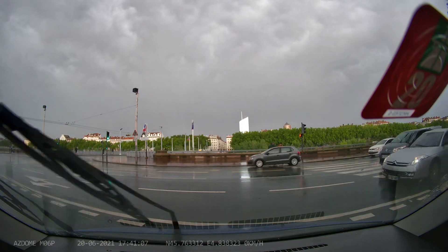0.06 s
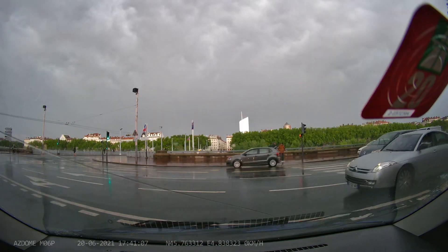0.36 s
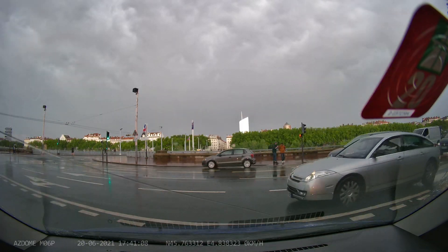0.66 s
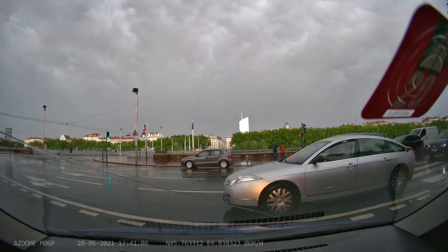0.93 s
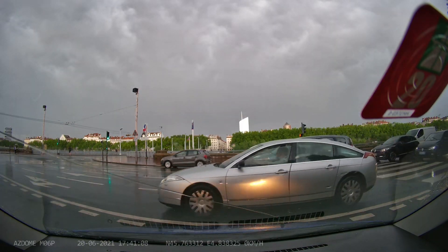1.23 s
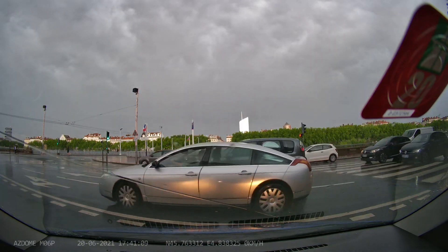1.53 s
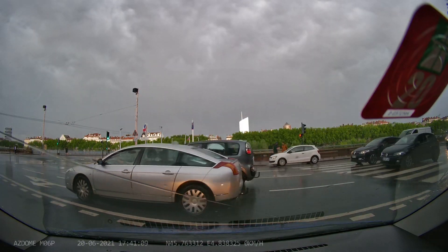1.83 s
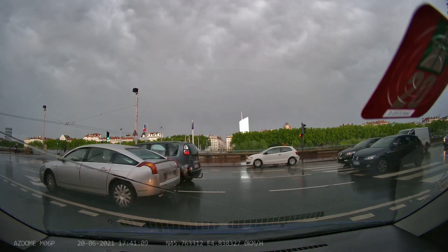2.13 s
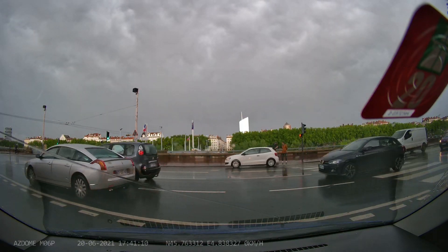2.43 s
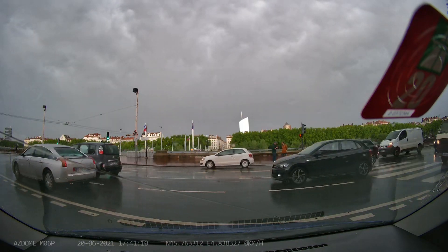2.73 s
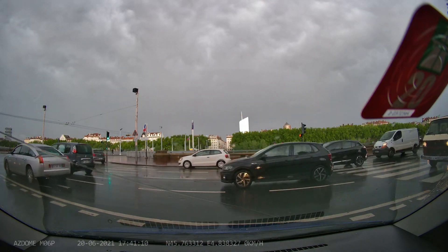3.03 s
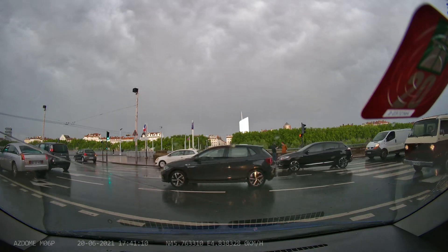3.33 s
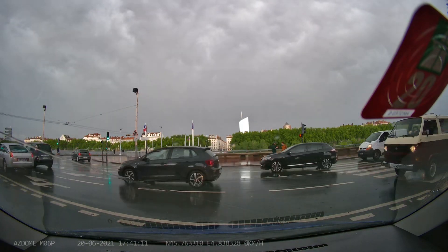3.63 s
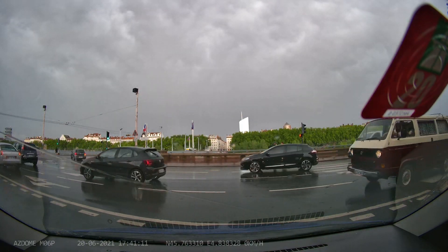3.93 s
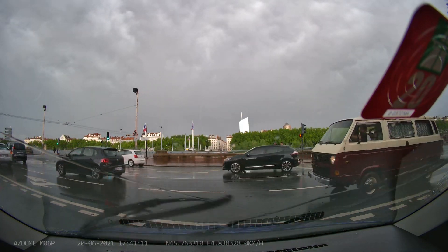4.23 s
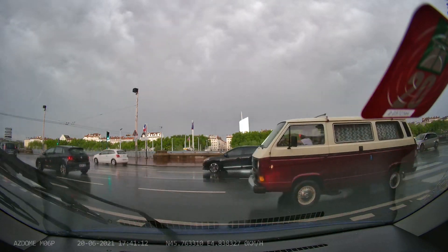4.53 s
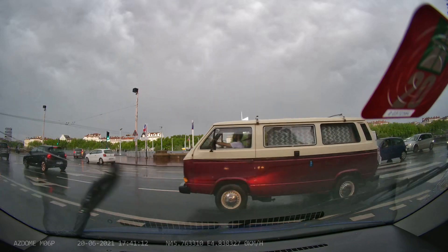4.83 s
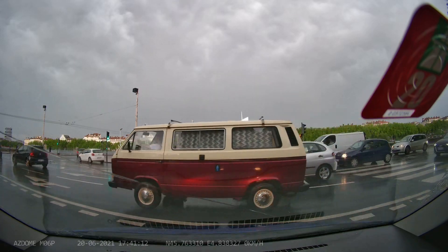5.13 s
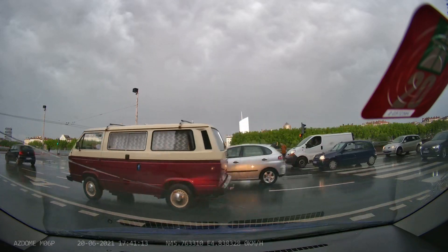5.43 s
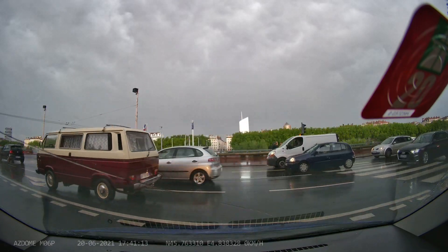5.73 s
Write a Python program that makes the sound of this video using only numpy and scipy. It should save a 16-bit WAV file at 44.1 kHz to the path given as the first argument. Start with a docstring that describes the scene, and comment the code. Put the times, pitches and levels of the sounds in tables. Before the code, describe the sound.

A wiper thrums and bumps as a car's engine settles to a low idle, heard from behind the windscreen. Something in the cabin rasps in several brief bursts, with light plastic knocks and dull thumps around them. Outside, cars and a van drone by on the wet street, dulled by the closed windows and stronger in the second half, when the wipers make another, stuttering sweep.

```python
"""Vehicles drone and swish past a wet junction, heard from inside a waiting car: gliding exhaust tones
over rumble, tyre roar and spray. Something in the cabin, perhaps a lever or a seat, rasps in short
bursts of slips that shake the trim. The wipers thrum and judder through two sweeps while the car's
own engine sinks to idle, with soft thuds, plastic ticks and faint squeaks in between."""
import sys
import numpy as np
from scipy import signal
from scipy.fft import rfft, irfft, next_fast_len
from scipy.io import wavfile
from scipy.ndimage import map_coordinates

SR = 44100
rng = np.random.default_rng(int(sys.argv[2]) if len(sys.argv) > 2 else 0)


def file_out(sig):
    """Save sig as 16-bit WAV at sys.argv[1]."""
    # one column per channel
    cols = np.atleast_2d(sig).T
    # limit, then scale
    lim = np.clip(cols, -1, 1)
    pcm = np.round(lim * 32767).astype(np.int16)
    wavfile.write(sys.argv[1], SR, pcm)


N = 263673
NOW = np.arange(N) / SR

# Colours of road rumble, tyre roar and wet spray through closed windows: f/Hz, level/dB
ROAD_RUMBLE = [(20, -17), (50, 4.5), (100, 2.5), (160, 0), (220, -8), (320, -8), (480, -22.5), (700, -43.5),
               (4000, -68)]
TYRE_ROAR = [(300, -14), (480, 3.5), (620, -2), (950, -2), (1300, -4.5), (1650, -14), (2200, -20),
             (3500, -28.5)]
WET_SPRAY = [(1400, -12), (2200, -3), (2530, 3), (2900, -5), (3400, -3.5), (4100, -14), (5500, -20),
             (9000, -32)]
# Pass-bys: nearest t/s, time for the drone to fall 12 dB/s, exhaust f/Hz, glide/(Hz/s), drone/dB,
# octave re firing tone/dB, rumble/dB, spray/dB
PASS_BYS = [(.25, 0.4, 100.7, -25, -52.5, -24, -52, -77.5), (1.831, 0.29, 91.5, 26, -46.5, -30, -63, -82),
            (3.692, 0.22, 101, -11.5, -35, -30, -56, -82), (4.02, 0.18, 103.2, 5, -34, -32, -49.5, -73.5),
            (5.15, 1.1, 66.22, 12.5, -42.5, -12.5, -48.5, -72.5), (5.9, 0.7, 73.66, 8, -50, -29, -56, -69)]
def traffic(half_power_s=0.48, far_rumble_db=-59.5, far_roar_db=-71.5, roar_over_spray_db=6):
    """Each vehicle brings its drone, rumble, tyre roar and spray over the wash of far traffic."""
    drones, rumble_power, spray_power = 0, 0, 0
    for s, fall_s, hz, glide, drone_db, octave_db, rumble_db, spray_db in PASS_BYS:
        drones += exhaust_drone(s, fall_s, hz, glide, drone_db, octave_db)
        rumble_power += amp(rumble_db) ** 2 * nearness(s, half_power_s)
        spray_power += amp(spray_db) ** 2 * nearness(s, half_power_s)
    rumble_gain = np.hypot(amp(far_rumble_db), np.sqrt(rumble_power))
    roar_gain = np.hypot(amp(far_roar_db), amp(roar_over_spray_db) * np.sqrt(spray_power))
    rumble = rumble_gain * amp(2.0 * wobble(11)) * noise(ROAD_RUMBLE)
    roar = roar_gain * amp(1.2 * wobble(7.5)) * noise(TYRE_ROAR)
    spray = np.sqrt(spray_power) * amp(0.88 * wobble(9.4)) * noise(WET_SPRAY)
    return drones + rumble + roar + spray


# Low partials of every exhaust: multiple of the firing tone, level/dB
EXHAUST_ORDERS = [(1 / 2, -19), (1, 0), (3 / 2, -17.5)]
def exhaust_drone(s, fall_s, hz, glide, db, octave_db, pull_s=1.1, waver_db=1.8, drift=.012):
    """An exhaust swells, glides with the vehicle's speed and fades; only low orders pass the glass."""
    pitch = (hz + glide * np.clip(NOW - s, -pull_s, pull_s)) * (1 + drift * wobble(14))
    phase = 2 * np.pi * np.cumsum(pitch) / SR
    tone = sum(amp(order_db + waver_db * wobble(16)) * np.sin(order * phase + rng.uniform(0, 2 * np.pi))
               for order, order_db in [*EXHAUST_ORDERS, (2, octave_db)])
    return amp(db) * nearness(s, fall_s) ** 2 * unit(tone)


# Ringing modes of the trim: f/Hz, width/Hz, level/dB
TRIM_MODES = [(245, 19.7, 3.5), (360, 84, -6.5), (437.4, 19, 2), (518, 25, -2.5), (569, 15, 5.5),
              (681, 35, -8.5), (737.5, 20.5, 1.5), (821, 29, -6), (969, 61, -4.5), (1085, 78, -4.5),
              (1199, 33, -4), (1368, 35, -8), (1462, 31, -10), (1567, 28, 0.5), (1812, 40, -2.5),
              (1980, 66, -5), (2115, 38, -5), (2270, 58, -6.5)]
# Colour of grit, also the bright edge of a knock: f/Hz, level/dB
GRIT_COLOUR = [(900, -1.5), (2000, 1.5), (3000, -4.5), (4200, -3), (5500, -10.5), (6900, -7), (9000, -16),
               (13000, -31)]
# Rasp cues: t/s, length/s, slip rate/Hz, unevenness 0-1, favoured f/Hz, boom/dB, low ring/dB,
# mid ring/dB, high ring/dB, grit/dB
RASP_CUES = [(1.415, 0.051, 135, 0.49, 425, -38, -37, -48, -56.5, -57),
             (2.182, .1, 130, 0.14, 1090, -26.5, -35.5, -37.5, -53.5, -54),
             (2.588, 0.019, 173, 0.26, 1390, -39, -54.5, -52.5, -66, -69),
             (2.636, .1, 170, 0.2, 573, -66, -57.5, -63, -74, -66.5),
             (3.116, 0.048, 158, 0.45, 3800, -33, -39.5, -46.5, -54, -68)]
def rasps(slip_t60=0.035, cabin_t60=0.13, scrape=0.16, grit_power=1.6, stop_lag_s=0.0316):
    """A run of slips pumps the cabin air, rings the trim, sheds grit and thuds into a stop."""
    out, t = np.zeros(N), NOW[:SR // 3]
    for s, length, rate_hz, uneven, spot_hz, boom_db, low_db, mid_db, high_db, grit_db in RASP_CUES:
        slips = slip_train(length, rate_hz, uneven, len(t))
        # every slip scrapes for a moment, so no two ring the trim alike
        scraping = signal.fftconvolve(slips, amp(-60 * t / slip_t60))[:len(t)]
        drive = favour(slips + scrape * scraping * rng.standard_normal(len(t)), spot_hz, boost_db=4.5)
        # the hardest slips shed most grit, which builds up as it echoes round the cabin
        echoing = signal.fftconvolve(slips ** grit_power, amp(-60 * t / cabin_t60))[:len(t)]
        boom = resonate(resonate(slips, [(111.2, 18.6, 0)]), [(117, 190, 0)])
        low = resonate(drive, [m for m in TRIM_MODES if m[0] < 850])
        mid = resonate(drive, [m for m in TRIM_MODES if 850 <= m[0] < 1520])
        high = resonate(drive, [m for m in TRIM_MODES if m[0] >= 1520])
        grit = echoing * noise(GRIT_COLOUR, len(t))
        layers = [(boom, boom_db), (low, low_db), (mid, mid_db), (high, high_db), (grit, grit_db)]
        add(out, s, sum(amp(db) * unit(x) for x, db in layers) * np.sqrt(length / t[-1]))
        add(out, s + length + stop_lag_s, thud(boom_db - 0.5, hz=114.5))
    return filtered(out, lambda hz: 1 / (1 + (hz / 9000) ** 6))


def slip_train(length, rate_hz, uneven, count, slowing=.05):
    """Stick-slip friction: uneven impulses whose force swells and eases."""
    jitter, scatter_db = rng.standard_normal((64, 2)).T
    at = (np.arange(len(jitter)) + np.clip(uneven * jitter, -.5, .5)) / rate_hz
    at[0] = 0
    at *= 1 + slowing * at / length  # the slips come more slowly as the push eases
    force = (1 + np.sin(np.pi * at / length)) * amp(scatter_db) * (at < length)
    return np.bincount((at * SR).astype(int), force, count)[:count]


# Colour of the wiper linkage: f/Hz, level/dB
LINKAGE_THRUM = [(60, -70), (110, 4), (170, 8), (300, 3), (400, -5.5), (550, -16), (1200, -47), (4000, -90)]
# Wiper turns: t/s, knock/dB, edge/dB, favoured f/Hz
WIPER_TURNS = [(.105, -43.5, -66, 703), (4.669, -38, -65, 990)]
def wiper_linkage(lead_s=0.566, tail_s=0.22, fade_s=.04, thrum_db=-51.5, strain_db=10.5, rough_db=2.5):
    """The linkage thrums through each sweep, then strains and knocks at the turn."""
    out = np.zeros(N)
    for s, knock_db, edge_db, spot_hz in WIPER_TURNS:
        running = (np.tanh((NOW - s + lead_s) / fade_s) - np.tanh((NOW - s - tail_s) / fade_s)) / 2
        strain = np.exp(-((NOW - s - 0.032) / 0.089) ** 2)  # peaks just after the turn
        out += amp(thrum_db + strain_db * strain + rough_db * wobble(25)) * running * noise(LINKAGE_THRUM)
        add(out, s, knock(knock_db, edge_db, spot_hz))
        add(out, s + 0.01286, thud(db=-36.5, hz=240.3))  # the arms bump as they turn
    return out


# Colour of rubber skipping on glass: f/Hz, level/dB
RUBBER_COLOUR = [(300, -6), (500, 6), (700, 8), (900, 3), (1200, -8.5), (1800, -44)]
# Judder cues: t/s, length/s, first skip/dB
JUDDER_CUES = [(.003, .02, -50.5), (4.051, .02, -54.5), (4.231, .33, -55.5)]
def blade_judder(gap_s=.0503, swell_s=0.0094, growth_db_per_s=19, scatter_db=2, jitter_s=0.00294):
    """The rubber blades skip over the glass, once or in a growing stutter."""
    out = np.zeros(N)
    age = NOW[:SR // 8] / swell_s
    envelope = age * np.exp(1 - age)
    for s, length, db in JUDDER_CUES:
        for lag in np.arange(0, length, gap_s):
            gain = amp(db + growth_db_per_s * lag + scatter_db * rng.standard_normal())
            onset = s + lag + jitter_s * rng.standard_normal()
            add(out, onset, gain * envelope * noise(RUBBER_COLOUR, len(age)))
    return out


# Orders 2, 3, 4 and 5 of the car's own engine: level/dB
ENGINE_ORDERS = [-5, 15, -17.5, -25]
def engine(idle_hz=16.2, extra_hz=15, settle_s=.58, waver_db=5):
    """The engine sinks to idle and quietens as it slows; its overtones waver as the body flexes."""
    revs = np.exp(-NOW / settle_s)
    phase = 2 * np.pi * np.cumsum(idle_hz + extra_hz * revs) / SR
    throb = np.sin(phase)
    overtones = sum(amp(db + waver_db * wobble(3.9)) * np.sin(order * phase + rng.uniform(0, 2 * np.pi))
                    for order, db in enumerate(ENGINE_ORDERS, 2))
    return amp(-57.5 + 13 * revs) * unit(throb) + amp(-64.5 + 25 * revs) * unit(overtones)


# Thud cues: t/s, peak/dB, f/Hz
THUD_CUES = [(0.152, -33.5, 130), (.205, -33, 98), (.634, -39, 93.3), (2.287, -28, 68.6), (2.542, -37, 115),
             (2.6, -41.5, 220), (2.861, -44.5, 113), (3.249, -33.5, 98.5), (3.391, -36, 102),
             (3.44, -32.5, 143), (3.455, -35, 54.6), (4.324, -34, 113), (4.751, -36, 268.5),
             (4.79, -41, 131)]
def body_thuds():
    """Bumps on the bodywork; those just after each wiper turn, sinking in pitch, come from the wiper motor
    running down."""
    out = np.zeros(N)
    for s, db, hz in THUD_CUES:
        add(out, s, thud(db, hz))
    return out


def thud(db, hz, swell_s=0.011):
    """A soft bump swells and dies in a few cycles."""
    t = NOW[:SR // 4]
    return amp(db) * t / swell_s * np.exp(1 - t / swell_s) * np.sin(2 * np.pi * hz * t)


# Knock cues: t/s, body/dB, edge/dB, favoured f/Hz
KNOCK_CUES = [(.953, -58.5, -77, 540), (.997, -50, -66, 530), (1.04, -55.5, -75, 497),
              (1.251, -59, -84, 400), (1.335, -57, -75, 494), (2.093, -53, -73, 600),
              (3.437, -50, -76, 198), (5.359, -45.5, -60.5, 1100)]
def cabin_knocks():
    """Stray knocks and ticks of the cabin's plastic."""
    out = np.zeros(N)
    for s, db, edge_db, spot_hz in KNOCK_CUES:
        add(out, s, knock(db, edge_db, spot_hz))
    return out


# Colour of hollow plastic: f/Hz, level/dB
PLASTIC_COLOUR = [(120, -10), (250, 10), (500, 6.5), (750, 0.5), (1100, -3.5), (1500, -16), (2500, -21.5),
                  (5000, -67)]
def knock(db, edge_db, spot_hz, body_t60=0.12, edge_t60=0.1, attack_s=0.0018):
    """A hollow plastic knock with a brief sharp edge."""
    t = NOW[:SR // 4]
    hollow = favour(noise(PLASTIC_COLOUR, len(t)), spot_hz, boost_db=3)
    body = amp(db - 60 * t / body_t60) * unit(hollow)
    edge = amp(edge_db - 60 * t / edge_t60) * noise(GRIT_COLOUR, len(t))
    return (body + edge) * (1 - np.exp(-t / attack_s))


# Squeak cues: t/s, length/s, f/Hz, width/Hz, level/dB
SQUEAK_CUES = [(0, 0.033, 1480, 69.5, -61.5), (.14, .05, 2520, 70, -73), (0.296, 0.11, 2480, 70, -73.5),
               (2.633, .11, 3330, 300, -67), (2.638, .09, 6460, 600, -75), (3.673, 0.087, 962, 50, -65.5)]
def squeaks():
    """Rubbing rubber or plastic excites one narrow resonance for a moment."""
    out = np.zeros(N)
    for s, length, hz, width, db in SQUEAK_CUES:
        arch = np.sin(np.linspace(0, np.pi, int(length * SR)))
        mode = [(hz, width, 0)]
        tone = resonate(resonate(rng.standard_normal(SR // 2), mode), mode)[-len(arch):]
        add(out, s, amp(db) * arch * unit(tone))
    return out


def nearness(s, half_s):
    """Inverse square of the distance to a pass-by: 1 at time s, a half half_s away."""
    return 1 / (1 + ((NOW - s) / half_s) ** 2)


def favour(x, hz, boost_db):
    """The spot that is touched brings out a third of an octave around hz."""
    return x + resonate(x, [(hz, hz / 4, boost_db)])


def resonate(x, modes):
    """x through resonances of alternating sign: f/Hz, width/Hz, level/dB."""
    return filtered(x, lambda f: sum((-1) ** k * amp(db) * 1j * f * width / (hz**2 - f**2 + 1j * f * width)
                                     for k, (hz, width, db) in enumerate(modes)))


def noise(colour, count=N):
    """Noise of rms 1 with a colour: f/Hz, level/dB."""
    f, db = np.transpose(colour)
    white = rng.standard_normal(count)
    return unit(filtered(white, lambda hz: amp(np.interp(np.log(hz + 1), np.log(f), db))))


def filtered(x, response):
    """x through a complex frequency response."""
    size = next_fast_len(len(x) + SR // 2)
    return irfft(rfft(x, size) * response(np.fft.rfftfreq(size, 1 / SR)), size)[:len(x)]


def wobble(rate):
    """A smooth random curve, rate knots a second."""
    return map_coordinates(rng.standard_normal(int(N * rate / SR) + 4), [NOW * rate])


def amp(db):
    """Decibels to gain."""
    return 10 ** (np.asarray(db) / 20)


def unit(x):
    """Scale to rms 1."""
    return x / np.sqrt(np.mean(x ** 2) + 1e-20)


def add(track, s, sound):
    """Mix a sound into the track at time s."""
    part = track[max(0, round(s * SR)):][:len(sound)]
    part += sound[:len(part)]


def scene():
    """The mono mix behind the windscreen: traffic outside, the car's own sounds within."""
    car = engine() + wiper_linkage() + blade_judder() + rasps()
    car += squeaks() + body_thuds() + cabin_knocks()
    return (traffic() + car)[None]


def record(dry, top_hz=15600):
    """The small microphone adds its own hiss and keeps nothing above its band limit."""
    hiss = amp(-73.5) * noise([(200, -2.5), (3000, -1.5), (8000, -1.5), (15000, -2.0)])
    return filtered(dry[0] + hiss, lambda hz: hz < top_hz)[None]


dry = scene()
out = record(dry)
file_out(out)
```